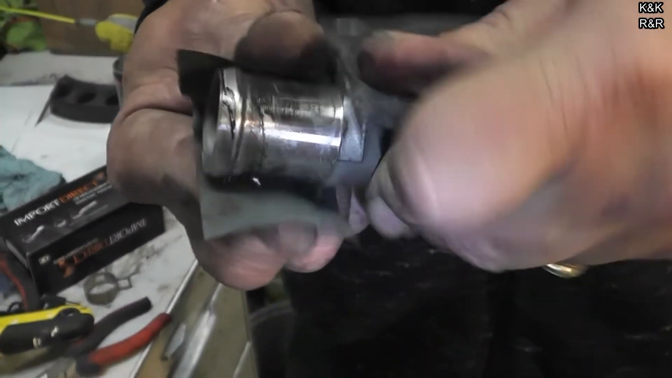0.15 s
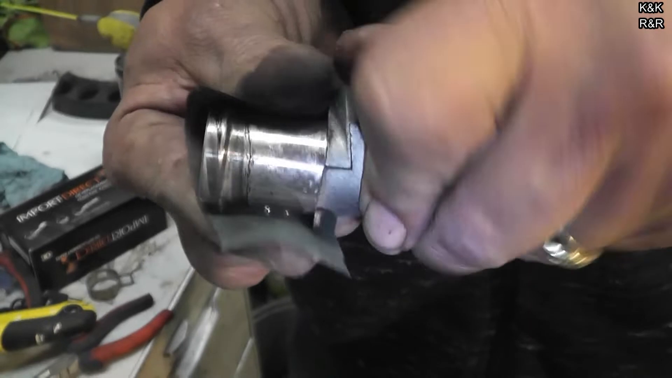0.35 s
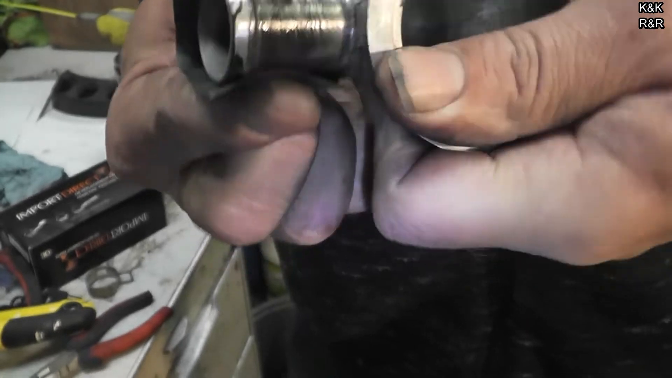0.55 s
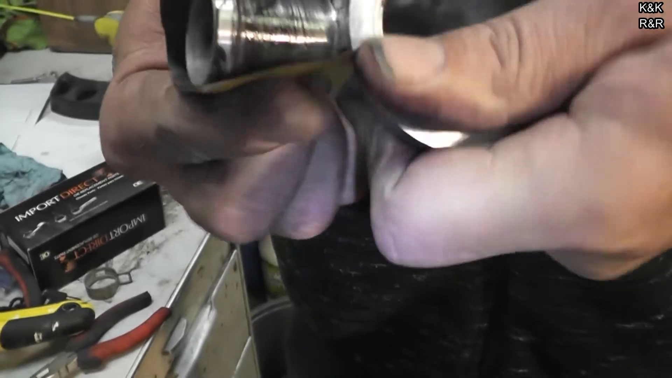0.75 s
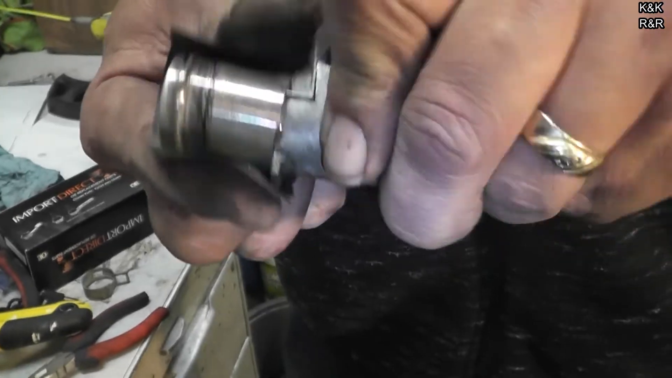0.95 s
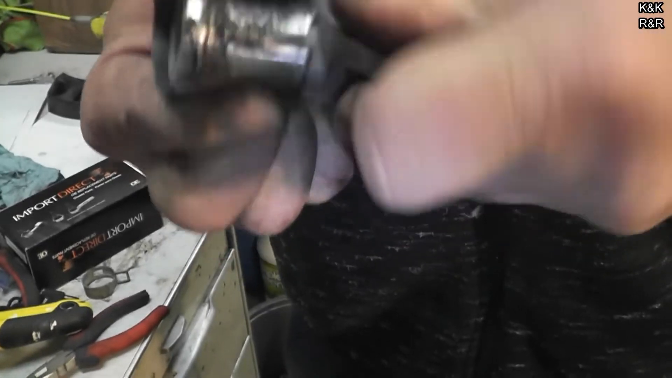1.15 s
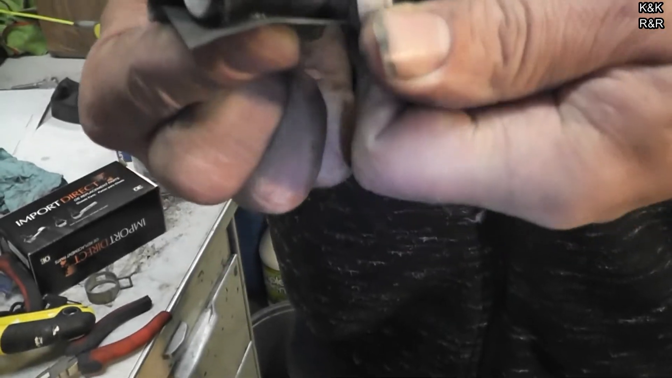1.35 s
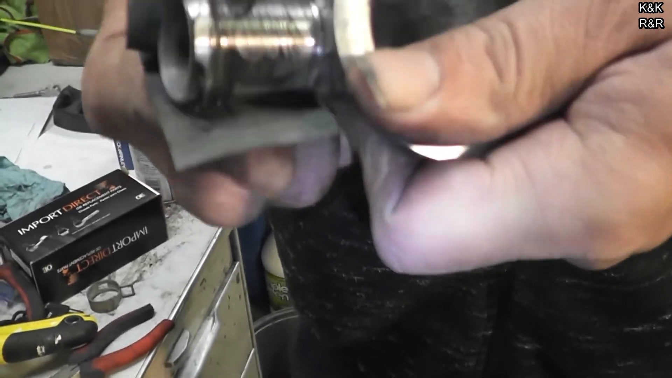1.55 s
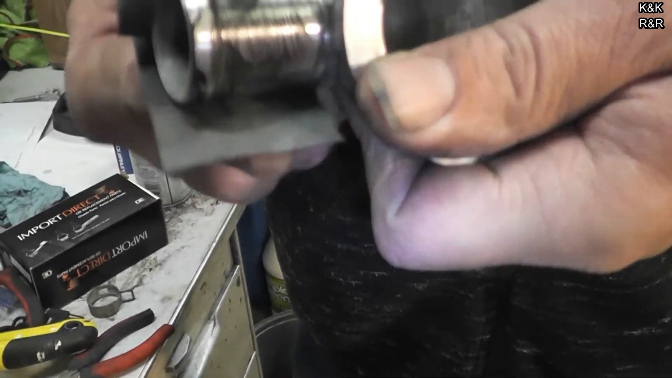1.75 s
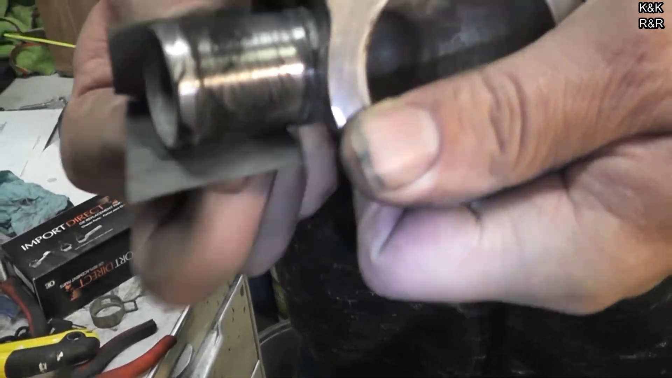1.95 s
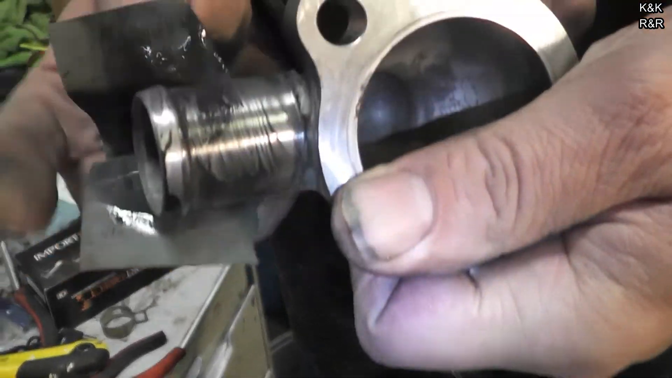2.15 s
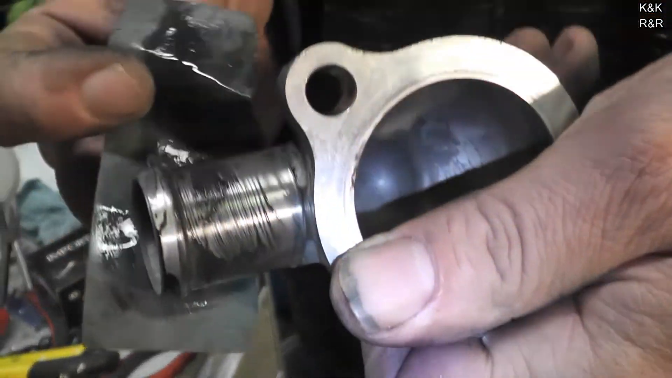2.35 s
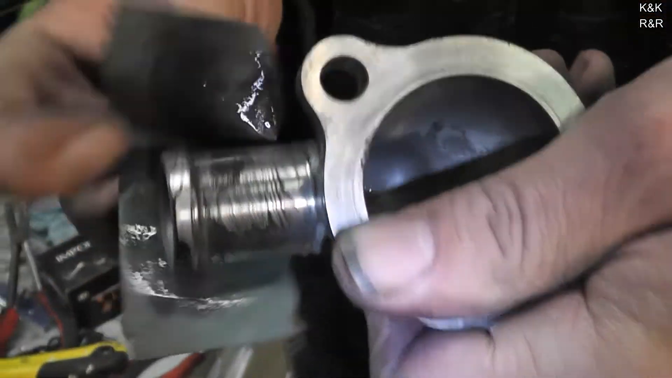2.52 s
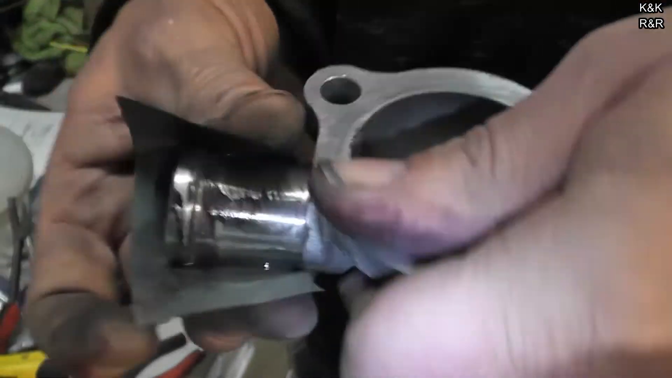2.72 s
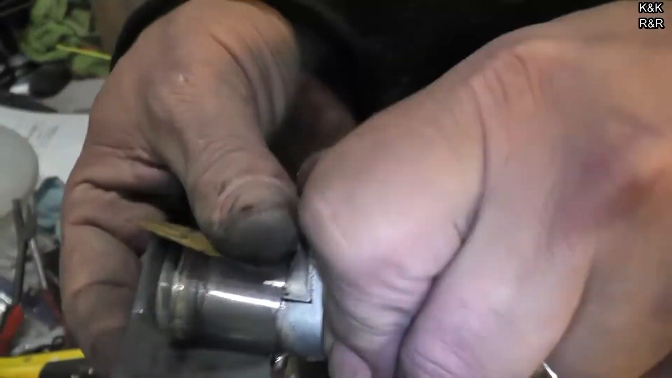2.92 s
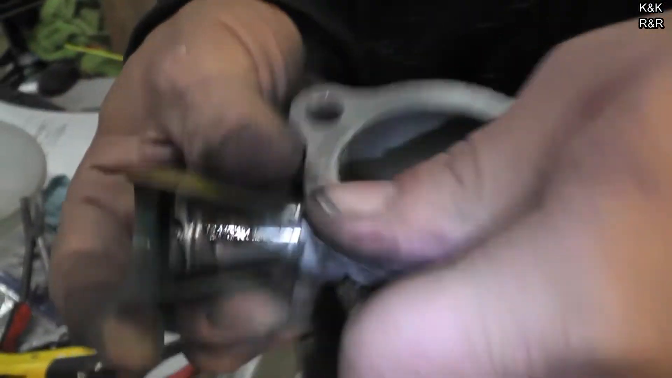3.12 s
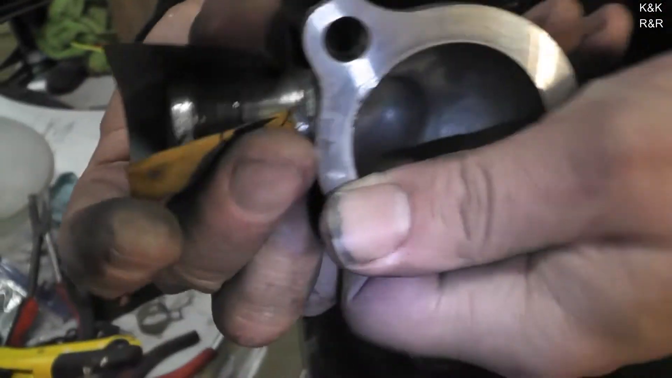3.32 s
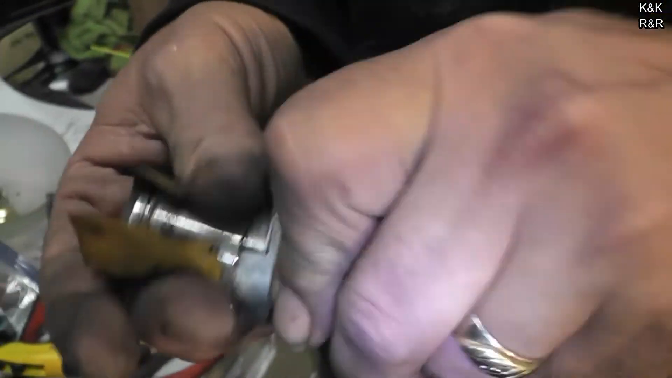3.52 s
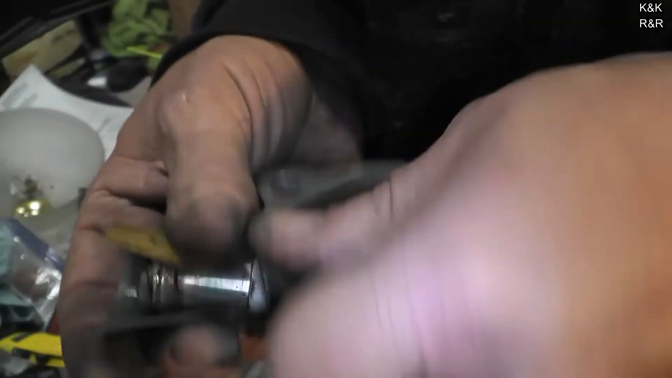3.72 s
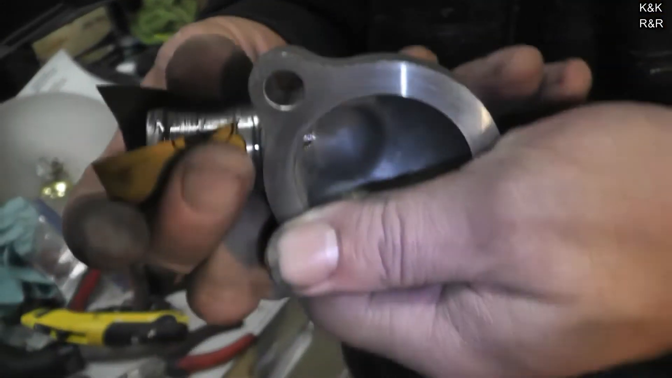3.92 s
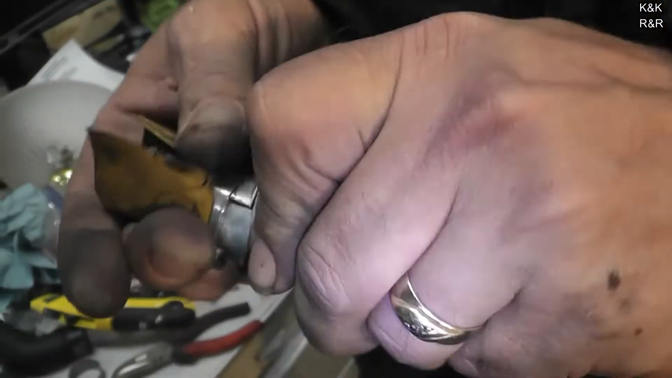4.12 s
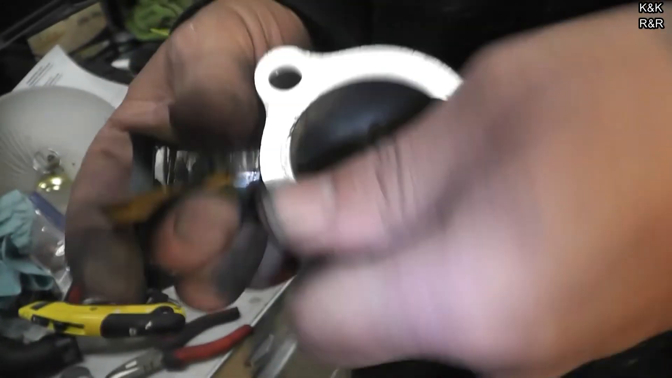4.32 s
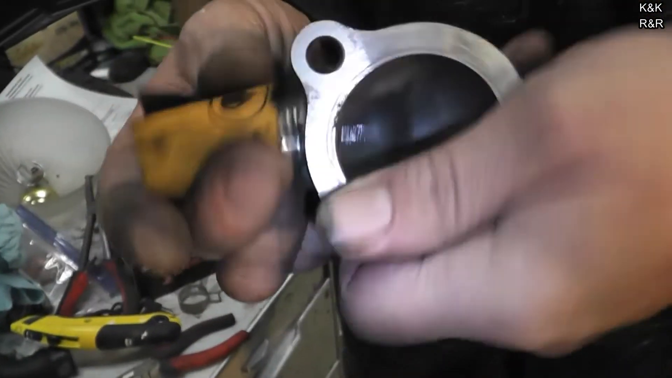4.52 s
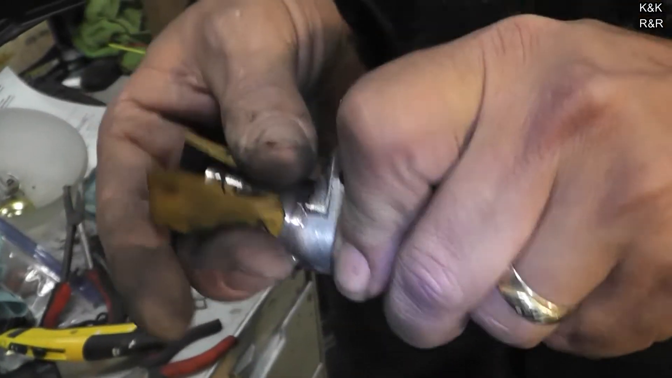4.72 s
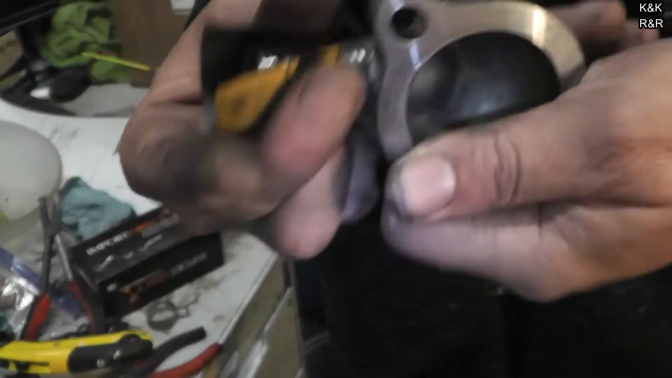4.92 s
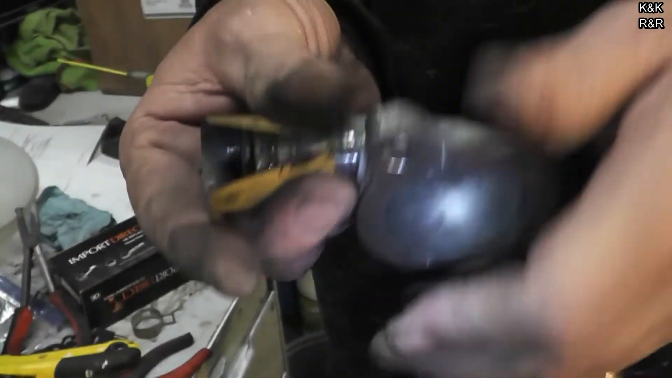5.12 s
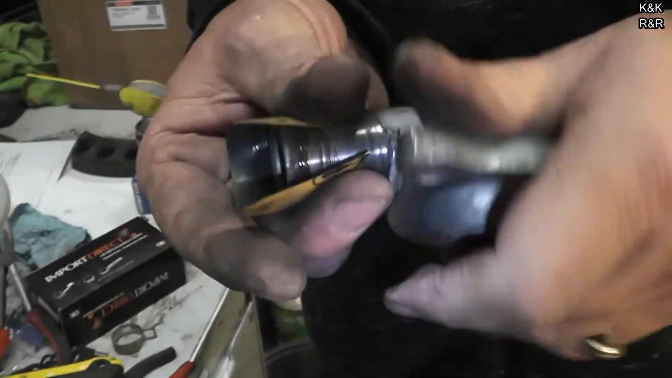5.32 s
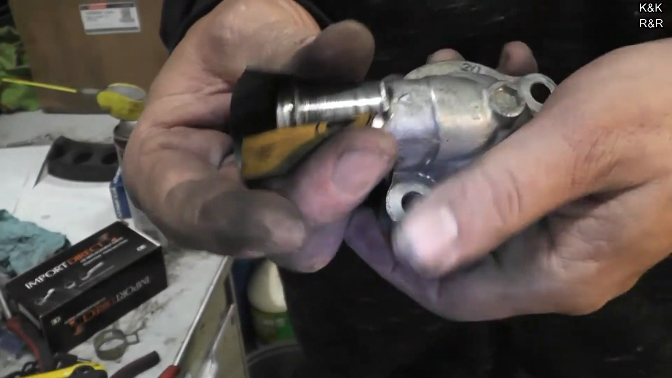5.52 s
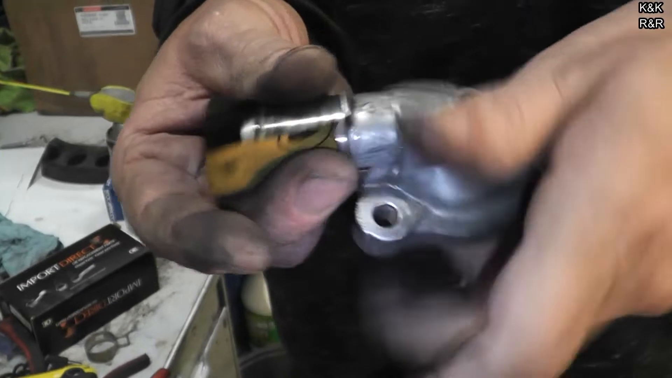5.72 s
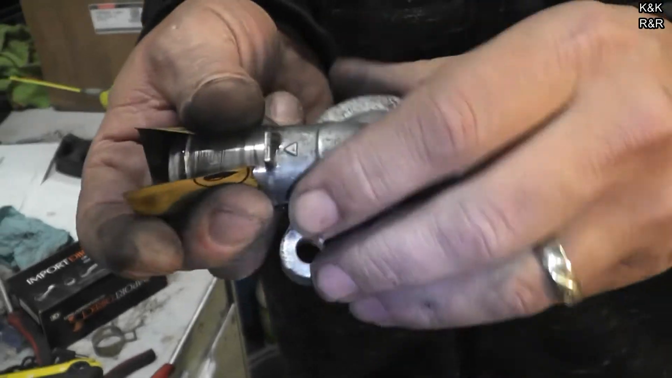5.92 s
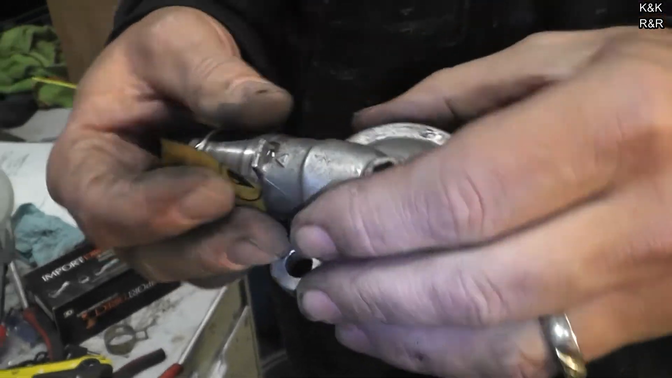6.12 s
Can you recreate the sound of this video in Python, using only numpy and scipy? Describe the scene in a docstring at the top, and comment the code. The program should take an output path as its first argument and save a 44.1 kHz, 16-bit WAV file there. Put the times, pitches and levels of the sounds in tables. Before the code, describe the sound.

Bright, crackling rubs of abrasive paper on metal come in uneven short bursts, then give way to loose paper rustles and small finger taps. A steadier run of back-and-forth scrubs follows, each ringing the hollow pipe and cupped fist. The last strokes are sparse. Close stereo microphone, fairly dry workshop, a faint low drone swelling and sinking.

```python
"""Wet sandpaper is twisted back and forth by hand round the neck of a cast metal pipe in a workshop.
From the start, strokes of crackling noise rasp brightly, and the hollow of pipe and fist rings along as a
moving resonance. Soft thuds, finger knocks (fading tones), short ticks (noise bursts) and light rubs join in.
After about two seconds the strokes pause and loose paper slides; then they return with a stronger hollow ring.
Near the end the strokes thin out. A low room tone of filtered noise swells and sinks throughout."""
import sys
import numpy as np
from scipy import signal
from scipy.fft import rfft, irfft
from scipy.io import wavfile
from scipy.ndimage import uniform_filter1d

SR = 44100
rng = np.random.default_rng(int(sys.argv[2]) if len(sys.argv) > 2 else 0)


def bounce(signal):
    """Save signal as a 16-bit WAV file at the path given by the first command-line argument."""
    frames = np.transpose(np.atleast_2d(signal))
    limited = np.clip(frames, -1, 1)
    pcm = np.round(limited * 32767).astype(np.int16)
    wavfile.write(sys.argv[1], SR, pcm)


N = 271656
TIME = np.arange(N) / SR

# Pressed strokes, one twist of the paper each; later steps shape these levels further. Columns:
# start t/s, length t/s, attack t/s, release t/s, rasp level/dB, sag over the stroke level/dB,
# hollow against rasp level/dB, place of the hardest squeeze (0-1 of the stroke), hollow f/Hz, paper f/Hz,
# neck f/Hz, neck glide f/Hz, neck ring level/dB, paper ring level/dB, fine fizz level/dB
TWISTS = [ (-0.011, 0.11, 0.024, 0.13, -21.5, 9, -20.5, 0.4, 1590, 8900, 3840, 50, 11.5, 9, 2),
          (0.141, 0.17, 0.083, 0.058, -18.5, 7.5, -20.5, .55, 1570, 9500, 4000, 653.5, 9.5, 7, 1),
          (0.366, 0.23, 0.033, 0.031, -22.5, 4, -21.5, .4, 1690, 8800, 4300, 300, -1.5, 7, -1),
          (0.573, 0.12, 0.02, .029, -32, -0.2, -22, 0.1, 1610, 9200, 4530, 200, 6.5, 0.5, -1),
          (0.735, 0.31, 0.028, .149, -24, -0.2, -19, 0.6, 1630, 7900, 4980, -150, 7, 4, 2),
          (1.088, 0.14, 0.035, 0.076, -23, -0.5, -20.5, 0.94, 1650, 10100, 5000, -400, 4.5, 2.5, 0.5),
          (1.197, 0.12, 0.049, 0.081, -24.5, 3.3, -19.5, 0.04, 1540, 11500, 4300, -300, 8.5, 2, 4),
          (1.43, 0.088, 0.055, 0.016, -30, -4, -20.5, .6, 1580, 7450, 4500, -100, 9.5, 6.5, -.5),
          (1.881, 0.26, 0.0071, 0.019, -30, 10.5, -21, .6, 1580, 9440, 4700, -750, 14.5, 11.5, 0),
          (2.503, 0.11, 0.0084, 0.012, -30, -6, -13.5, 0.75, 1590, 8800, 3830, 170, 12.5, 8, -1.5),
          (2.842, .139, 0.017, 0.077, -24, -2, -20, 0.6, 1920, 8350, 3950, 198, 12.5, 7.5, 2.5),
          (3.061, 0.27, 0.039, 0.081, -23.5, -2, -14, 0.79, 1740, 8700, 4100, 640, 10.5, 8.5, 1.5),
          (3.408, 0.23, 0.0068, 0.12, -23, 4, -14, 0, 1740, 8840, 3650, 273.5, 9, 8, 0),
          (3.725, 0.25, 0.012, 0.11, -21.5, 5, -15, 0.68, 1770, 7900, 3780, -50, 10, 8.5, 1),
          (3.972, 0.24, 0.059, 0.094, -22.5, 0.2, -14.5, 0, 1710, 8160, 3760, -50, 12.5, 8.5, 1),
          (4.292, 0.19, 0.0054, 0.11, -22.5, 0.5, -14, 0.76, 1750, 9070, 3770, 469, 7.5, 10, 0),
          (4.507, 0.21, 0.069, 0.069, -24.5, -3.5, -15, 0.03, 1800, 8660, 4070, -150, 9, 10, -1),
          (4.815, 0.19, 0.017, 0.076, -22.5, 2.5, -16.5, 0.48, 1710, 9900, 4370, -300, 9, 9, -1),
          (5.32, 0.21, 0.032, 0.041, -25, 5.5, -16.5, 0.72, 1520, 9600, 4770, 1000, 3.5, 3.5, -0.5),
          (6.03, 0.068, 0.018, 0.041, -25.5, 5, -17, 0.76, 1690, 8400, 4280, -50, 9, 11, 0.5), ]
# Moments when the paper catches and the hands thud: t/s, thud level/dB before its shape and the left-right balance
GRABS = [(0.226, -45), (0.412, -40), (0.764, -46), (1.128, -44), (2.602, -47), (2.85, -44), (3.235, -48),
         (3.41, -41), (3.447, -44.5), (3.847, -46), (4.133, -56), (4.363, -36.5), (4.575, -40.5)]

GRIP_WAVER, GRIP_WAVER_HZ = 0.017, 15  # the fingers' hold wavers: share of pitch, rate in Hz
RUB_ATTACK, RUB_RELEASE = 0.34, 0.38  # shares of the length of a rub or squelch


def amp(db):
    """Turns decibels into a gain."""
    return 10 ** (np.asarray(db) / 20)


def unit(x):
    """Scales a sound to an rms (average strength) of 1."""
    return x / np.sqrt(np.mean(x ** 2) + 1e-20)


def at_hz(points, hz, axis=1):
    """Reads a column of a frequency table, with frequency on a log scale."""
    points = np.asarray(points, float)
    return np.interp(np.log(hz + 1), np.log(points[:, 0] + 1), points[:, axis])


def at_time(rows, t):
    """Reads every column of a time table at the times t."""
    s, *columns = np.transpose(rows)
    return [np.interp(t, s, column) for column in columns]


def add(mix, s, sound):
    """Mixes a sound in at s seconds."""
    part = mix[..., max(round(s * SR), 0):][..., :sound.shape[-1]]
    part += sound[..., :part.shape[-1]]


def colour(x, points):
    """Filters by a fixed spectrum (Hz, dB) and scales to an rms of 1."""
    length = x.shape[-1]
    gain = amp(at_hz(points, np.fft.rfftfreq(length, 1 / SR)))
    return unit(irfft(rfft(x) * gain, length))


def wander(rate_hz):
    """Smooth random curve with an rms of 1, whose changes weaken above the given rate."""
    hz = np.fft.rfftfreq(N, 1 / SR)
    noise = rfft(rng.standard_normal(N))
    return unit(irfft(noise / (1 + (hz / rate_hz) ** 2), N))


def resonate(x, hz, width_hz):
    """A resonance whose pitch follows the curve hz: shift down to zero, smooth, and shift back up."""
    turn = np.exp(2j * np.pi * np.cumsum(hz) / SR)
    r = np.exp(-np.pi * width_hz / SR)
    return 2 * (turn * signal.lfilter([1 - r], [1, -r], x / turn)).real


def bump(hz, centre_hz, width_hz):
    """A bell of height 1 round a frequency."""
    return 1 / (1 + (2 * (hz - centre_hz) / width_hz) ** 2)


def grit(per_s, spread_db, hiss):
    """Tiny slips of random size and sign over the hiss of countless finer ones."""
    happens = rng.random(N) < per_s / SR
    sign = rng.choice([-1, 1], N)
    size = amp(spread_db * np.clip(rng.standard_normal(N), -2, 2))
    return unit(unit(happens * sign * size) + hiss * rng.standard_normal(N))


def rasp(level_db, judder):
    """Grit snaps on the metal, coloured by the pipe neck and by the paper, whose stiffness shifts with the grip."""
    # Basic tone of the rasp: f/Hz, level/dB
    paper_tone = [(1300, -25.5), (2300, -21), (3300, -8), (3700, -8), (4500, -8), (6000, -6.5),
                  (7500, -4.5), (9300, -1.8), (11000, -3.5), (12500, -6.5), (14000, -11.5), (15800, -15.5)]
    # Part of the rasp that is opposite at the two sides, against the shared part: f/Hz, level/dB
    treble_apart = [(2000, -51), (2700, -39), (3600, -82), (9000, -82), (10500, -13), (12000, -7.5),
                    (13800, -4.5), (16000, 2)]
    ring_from_db, ring_range_db = -62, 33  # the sheet rings more as it is pulled taut
    loose_dull_db = 3.5  # loose paper loses its fizz

    slips = [grit(per_s=5500, spread_db=1.0, hiss=0.83) for _ in range(2)]
    hz, t, (shared, apart) = signal.stft(slips, SR, nperseg=512, noverlap=384)
    hz = hz[:, None]
    frame_db = np.interp(t, TIME, level_db)
    _, paper_hz, neck_hz, neck_db, paper_db, fizz_db = grip(t)
    neck_hz = neck_hz * (1 + GRIP_WAVER * np.interp(t, TIME, wander(GRIP_WAVER_HZ)))

    # A light touch rings the neck and the sheet less, and is duller
    pressure = np.clip((frame_db + 53.5) / 25, .3, 1)
    taut = np.clip((frame_db - ring_from_db) / ring_range_db, 0, 1.2)
    fizz_tilt = np.clip((hz - 9000) / 3500, -1, 1)
    shape_db = at_hz(paper_tone, hz) + (fizz_db - loose_dull_db * (1 - taut)) * fizz_tilt
    shape_db += pressure * neck_db * bump(hz, neck_hz, width_hz=960)
    shape_db += taut * paper_db * bump(hz, paper_hz, width_hz=4800)
    shape_db -= 7 * bump(hz, 3530, width_hz=740)  # a fixed dip, mostly under the neck's ring

    # Folds of the sheet ring briefly, each at its own pitch
    folds = uniform_filter1d(rng.standard_normal(shared.shape), size=5, axis=0)
    folds = unit(uniform_filter1d(folds, size=24, axis=1))
    gain = amp(shape_db + 2.6 * folds)
    gain /= np.linalg.norm(gain, axis=0)  # tone only: the loudness is set below

    apart = apart * amp(at_hz(treble_apart, hz))
    sides = gain * np.array([shared + apart, shared - apart])
    sound = signal.istft(sides, SR, nperseg=512, noverlap=384)[1][:, :N]
    # Loose paper flutters more than paper that is pressed down
    flutter_db = np.interp(level_db, [-42, -24], [1.7, .9])
    return unit(sound) * amp(level_db + flutter_db * judder + 0.76)


def hollow(level_db, judder):
    """The same rubbing rings the air in the pipe and the cupped hand."""
    hollow_hz = grip(TIME)[0] * (1 + GRIP_WAVER * wander(GRIP_WAVER_HZ))
    drive = grit(per_s=1200, spread_db=2.0, hiss=0.6)
    ring = resonate(drive, hollow_hz, width_hz=310)
    ring = resonate(ring, hollow_hz, width_hz=14000)
    return unit(ring) * amp(level_db + 0.61 * judder + 0.28)


def friction():
    """Levels (dB) at which all strokes and slides drive the rasp and the hollow, added up as powers."""
    # Light slides of loose paper as the hand takes a new grip:
    # start t/s, length t/s, attack t/s, rasp level/dB, hollow against rasp level/dB
    slides = [ (0.142, 0.048, .006, -34, -28), (0.323, 0.073, .035, -37, -16),
              (0.695, 0.055, 0.017, -33.5, -14), (1.041, .083, .055, -33, -9.5),
              (1.32, 0.1, .009, -38, -16), (1.487, 0.094, 0.021, -33, -14), (1.665, 0.45, 0.071, -41, -8.5),
              (1.757, 0.024, 0.012, -28.5, -32), (2.237, 0.1, 0.01, -47.5, -7),
              (2.378, 0.039, 0.025, -33.5, -11), (2.453, 0.089, 0.049, -31.5, -10.5),
              (2.612, 0.13, .006, -38.5, -18), (2.763, 0.24, 0.073, -37.5, -15),
              (2.818, 0.069, 0.0096, -28, -14), (2.97, 0.27, 0.13, -36.5, -14),
              (3.373, 0.041, 0.029, -31, -11), (3.681, .081, 0.046, -34, -15),
              (4.198, 0.26, 0.05, -34, -10), (4.765, 0.2, 0.072, -31, -17), (5.015, 0.17, 0.04, -40, -9),
              (5.248, 0.03, .012, -49, -11), (5.285, 0.052, .042, -43.5, -7),
              (5.508, 0.14, .065, -39.5, -18), (5.632, 0.18, 0.048, -35, -13.5),
              (5.962, 0.15, 0.0045, -42, -39), (6.075, 0.11, .012, -41.5, -9.5), ]
    # Wet paper squelches in the fist and rings the hollow alone: start t/s, length t/s, level/dB
    squelches = [(0.657, 0.031, -43.5), (3.653, 0.042, -41.5), (5.642, 0.11, -44)]
    slide_release, slide_sag_db = 0.31, 10.5  # share of a slide spent stopping; fall of level along it
    resting_rasp_db, resting_hollow_db = -63, -78  # the paper never lies quite still
    bite_db, bite_s, bite_attack_s = 3.5, 0.026, 0.01  # overshoot, its fade, and how quick a start it needs
    arch_db, top_db = 15.5, 1.5  # the hollow swells with the squeeze: curve of that arch, lift at its top

    flicker_db = 3 * wander(rate_hz=20)  # the resting paper rustles unevenly
    rasp_power = amp(resting_rasp_db + flicker_db) ** 2
    hollow_power = amp(resting_hollow_db + flicker_db) ** 2

    for start, length, attack, release, level_db, sag_db, hollow_db, hardest, *_ in TWISTS:
        gain = amp(level_db) * gesture(start, length, attack, release, sag_db)
        moving = gain > 0
        since = TIME[moving] - start
        # The quicker the paper breaks free, the more it overshoots before it settles
        overshoot_db = bite_db * np.exp(-attack / bite_attack_s - since / bite_s)
        squeeze_db = top_db - arch_db * (since / length - hardest) ** 2
        rasp_power[moving] += (gain[moving] * amp(overshoot_db)) ** 2
        hollow_power[moving] += (gain[moving] * amp(hollow_db + squeeze_db)) ** 2

    for start, length, attack, level_db, hollow_db in slides:
        gain = amp(level_db) * gesture(start, length, attack, slide_release * length, slide_sag_db)
        rasp_power += gain ** 2
        hollow_power += (gain * amp(hollow_db)) ** 2

    for start, length, level_db in squelches:
        gain = amp(level_db) * gesture(start, length, RUB_ATTACK * length, RUB_RELEASE * length)
        hollow_power += gain ** 2
    return 10 * np.log10(rasp_power) + catches(), 10 * np.log10(hollow_power)


def gesture(start, length, attack, release, sag_db=0):
    """Gain of one movement: it speeds up, holds while the pressure sags, and slows to a stop."""
    rise_power, fall_power = 1.04, 1.076  # how gently it starts and ends
    gain = np.zeros(N)
    moving = (TIME > start) & (TIME < start + length)
    since = TIME[moving] - start
    rise = np.clip(since / max(attack, 1e-3), 0, 1)
    fall = np.clip((length - since) / max(release, 1e-3), 0, 1)
    gain[moving] = rise ** rise_power * fall ** fall_power * amp(-sag_db * since / length)
    return gain


def grip(t):
    """Each stroke's grip tunes the resonances, which glide along it and move to the next grip in the pause."""
    hollow_rise, paper_rise = 0.029, 0.077  # shares by which the pitches rise as the sheet tightens in a stroke
    rows = []
    for start, length, _, release, _, _, _, _, hollow_hz, paper_hz, neck_hz, glide_hz, *rings_db in TWISTS:
        end = start + length - release / 2
        for when, half, glide in [(start, -0.5, 0), (end, 0.5, glide_hz)]:
            hollow_now = hollow_hz * (1 + half * hollow_rise)
            paper_now = paper_hz * (1 + half * paper_rise)
            rows.append((when, hollow_now, paper_now, neck_hz + glide, *rings_db))
    return at_time(sorted(rows), t)


def catches():
    """Surge of the rasp (dB) around each moment when the paper catches."""
    catch_db, rise_s, fade_s = 1, 0.011, 0.019
    surge_db = np.zeros(N)
    for s, _ in GRABS:
        since = TIME - s
        surge_db += catch_db * np.exp(-abs(since) / np.where(since < 0, rise_s, fade_s))
    return surge_db


def skin(rasp_db, judder):
    """Fingers drag over the casting with a dull, uneven scuff that rings the air under the palm."""
    # Fingers shift on the casting: start t/s, length t/s, level/dB before the trim at the end
    rubs = [(0.88, 0.15, -39.5), (1.646, 0.34, -44.5), (2.05, 0.064, -44.5), (2.487, 0.15, -37),
            (3.158, 0.2, -46.5), (3.639, 0.048, -43), (4.03, 0.32, -44), (5.04, 0.088, -52),
            (5.501, 0.1, -43.5), (5.645, 0.088, -37.5)]
    # Tone of the scuff: f/Hz, level/dB
    scuff_tone = [(100, -16), (250, -7.5), (500, -3), (800, -1.5), (1200, 1), (1700, -2), (2600, -16),
                  (5000, -38.5)]
    # The palm covers and uncovers the mouth of the casting: t/s, ring f/Hz, ring against scuff level/dB
    palm = [(0, 500, -7), (1.3, 476, -12.5), (1.8, 896, -8), (2.55, 430, -6.5), (3.7, 556, -2.5),
            (4.3, 467, -11.5), (5.55, 1300, -7), (5.65, 780, 1.5), (6.16, 780, -4)]
    follow_db, follow = -37.5, 0.45  # the holding hand scuffs along: level at 0 dB rasp, dB per dB of rasp

    power = amp(follow_db + follow * rasp_db) ** 2
    for start, length, level_db in rubs:
        gain = amp(level_db) * gesture(start, length, RUB_ATTACK * length, RUB_RELEASE * length)
        power += gain ** 2
    ring_hz, ring_db = at_time(palm, TIME)
    scuff = colour(grit(per_s=700, spread_db=1.5, hiss=0.35), scuff_tone)
    ring = resonate(grit(per_s=700, spread_db=-1, hiss=1.0), ring_hz, width_hz=103)
    ring = unit(resonate(ring, ring_hz, width_hz=840))
    blend = (scuff + amp(ring_db) * ring) / np.hypot(1, amp(ring_db))
    return blend * np.sqrt(power) * amp(0.64 * judder - 2.16)


def knocks():
    """Fingers knock on the casting: one main pitch over its hand-damped modes, all fading."""
    # Knocks: t/s, level/dB before the blend below, main ring f/Hz, time for the ring to fall 60 dB t/s
    finger_hits = [(0.421, -27, 427, 0.011), (0.661, -41, 1025, 0.07), (0.933, -36.5, 1044, 0.088),
                   (0.967, -42.5, 800, 0.037), (2.32, -41.5, 345, 0.023), (2.396, -36, 1006, 0.044),
                   (2.417, -35.5, 247, 0.075), (2.551, -40, 1040, 0.036), (2.848, -47, 522, 0.026),
                   (3.401, -37, 535, 0.04), (3.446, -31, 1010, 0.018), (3.662, -35, 575, 0.023),
                   (3.811, -34, 620, 0.04), (4.134, -27, 660, 0.019), (4.382, -30, 860, 0.022),
                   (5.681, -39, 772, 0.14), (5.71, -38, 795, 0.061)]
    # Modes of the casting: f/Hz before a random shift, level/dB against each other, time to fall 60 dB t/s
    modes = [(490, -5.5, 0.1), (847, 0.5, 0.081), (1050, 1, 0.032), (1378, 2.5, 0.055), (1840, 1, 0.038),
             (3710, 5.5, 0.035)]
    out = np.zeros(N)
    t = np.arange(8192) / SR
    for s, level_db, ring_hz, ring_t60 in finger_hits:
        body = np.zeros(len(t))
        for hz, db, t60 in modes:
            shifted_hz = hz * rng.uniform(.94, 1.06)
            body += amp(db - 60 * t / t60) * np.sin(2 * np.pi * shifted_hz * t)
        ring = amp(-60 * t / ring_t60) * np.sin(2 * np.pi * ring_hz * t)
        add(out, s, amp(level_db) * (0.23 * body + 0.95 * ring))
    return out


def ticks():
    """Short ticks: bursts of noise that fall 60 dB in about 5 ms."""
    # Single ticks: t/s, peak level/dB
    bursts = [(0.661, -19), (0.7377, -18.5), (0.7444, -17), (2.2107, -27), (2.301, -28), (2.323, -22.5),
              (2.402, -27), (2.4179, -21), (2.851, -14), (3.664, -26)]
    burst_tone = [(300, 5), (1700, -9), (2800, -33), (4500, -2.0), (9000, 5.5), (16000, -15)]  # f/Hz, level/dB
    out = np.zeros(N)
    t = np.arange(1024) / SR
    for s, peak_db in bursts:
        burst = colour(rng.standard_normal(len(t)), burst_tone)
        burst *= amp(-60 * t / 0.0049)
        add(out, s, amp(peak_db) * burst / abs(burst).max())
    return out


def thuds():
    """The hands jolt as the paper grabs: one low swing and a puff of air, stronger at the left."""
    puff_tone = [(20, -30.0), (100, -5.5), (190, -7.5), (400, -11), (1500, -55)]  # f/Hz, level/dB
    out = np.zeros((2, N))
    t = np.arange(8192) / SR
    for s, level_db in GRABS:
        puff = colour(rng.standard_normal((2, len(t))), puff_tone)
        swing = np.sin(2 * np.pi * rng.uniform(42, 111) * t)
        u = t / 0.0073  # the swell is largest after 7.3 ms
        add(out, s, amp(level_db) * (.55 * swing + .55 * puff) * u * np.exp(1 - u))
    return out * amp([[2.2], [-2.2]])


def handling(rasp_db):
    """A faint rumble of the moving hands follows the strokes, stronger at the left."""
    air = rng.standard_normal(N) + 2.9 * rng.standard_normal((2, N))  # shared noise plus one for each side
    rumble = colour(air, [(15, -15), (50, 13), (120, 3.0), (300, -0.5), (700, -30), (2000, -55)])
    return rumble * amp(1.28 * rasp_db - 43) * amp([[1.5], [-1.5]])


def workshop(x):
    """A short tail from bench and walls, starting after the sound has crossed to them."""
    # Time for the tail to fall 60 dB: f/Hz, t/s
    fade_times = [(100, 1), (1000, 0.39), (4000, 0.028), (9000, 0.17), (16000, 1)]
    delay = np.arange(SR // 2) / SR
    echoes = rng.standard_normal((2, len(delay))) * (delay > .004)
    hz, t, z = signal.stft(echoes, SR, nperseg=256)
    fade = amp(-60 * t / at_hz(fade_times, hz)[:, None])
    tail = signal.istft(z * fade, SR, nperseg=256)[1]
    return signal.fftconvolve(x[None], tail / np.linalg.norm(tail[0]), axes=1)[:, :N]


def room_tone():
    """Low noise of the workshop, partly alike at both sides; its low middle swells slowly."""
    # Tone of the steady noise: f/Hz, level/dB
    steady_tone = [(15, -52), (25, -31), (97, 4), (229, 2), (476, -3.5), (560, 4.5), (695, 0), (936, 2),
                   (1230, -11), (1940, -11), (2480, -38), (4610, -11), (5880, -19), (9570, -11.5),
                   (16000, -38)]
    # How alike left and right are: f/Hz, likeness (0-1)
    likeness = [(50, 0.32), (130, 0.19), (300, 0.66), (700, 0.24), (2000, 0.97), (12000, 1)]
    # The low drone swells and sinks: t/s, level/dB before a 2 dB cut
    swell = [(0.0, -52.5), (0.65, -57.5), (0.9, -48), (1.58, -48.5), (1.95, -57.5), (2.52, -50),
             (3.74, -58), (4.22, -47.5), (4.7, -48.5), (5.3, -56), (6.16, -61)]
    hz = np.fft.rfftfreq(N, 1 / SR)
    same = np.clip(at_hz(likeness, hz), 0, 1)
    shared, apart = rfft(rng.standard_normal(N)), rfft(rng.standard_normal((2, N)))
    noise = irfft(np.sqrt(same) * shared + np.sqrt(1 - same) * apart, N)
    swell_db, = at_time(swell, TIME)
    drone = colour(noise, [(60, -24), (150, -5.0), (250, 1.5), (340, -1), (500, -5.0), (1000, -28.5)])
    steady = colour(noise[:, ::-1], steady_tone)  # played backwards so that it does not match the drone
    return steady * amp(-54) + drone * amp(swell_db - 2.0)


def scene():
    """The strokes drive all the rubbing sounds, and one stick-slip judder shakes them together."""
    rasp_db, hollow_db = friction()
    judder = wander(rate_hz=44)
    bright = rasp(rasp_db, judder)
    dull = hollow(hollow_db, judder) + skin(rasp_db, judder) + knocks() + ticks()
    room = workshop(amp(-15) * dull + amp(-28) * bright.mean(axis=0))
    return bright + dull + room + thuds() + handling(rasp_db) + room_tone()


def record(dry):
    """Two microphone openings that differ in timing and level by frequency, then a cut of the top treble."""
    # The two openings: f/Hz, left lead [radians], left minus right level/dB
    openings = [(600, .1, .4), (1100, .2, .9), (1700, 0, 0), (9800, 0, 0), (11200, .2, -1.2),
                (12500, .65, 1.8), (13700, .15, 5.5), (14900, -.7, 3.3), (16000, -.4, 1.5)]
    hz = np.fft.rfftfreq(N, 1 / SR)
    side = np.array([[.5], [-.5]])
    lead = np.exp(1j * side * at_hz(openings, hz))
    balance = amp(side * at_hz(openings, hz, axis=2))
    heard = irfft(rfft(dry) * lead * balance, N)
    low_pass = signal.firwin(511, 15950, window=("kaiser", 9), fs=SR)  # cutoff in Hz
    return signal.oaconvolve(heard, low_pass[None], "same")


dry = scene()
out = record(dry)
bounce(out)
```